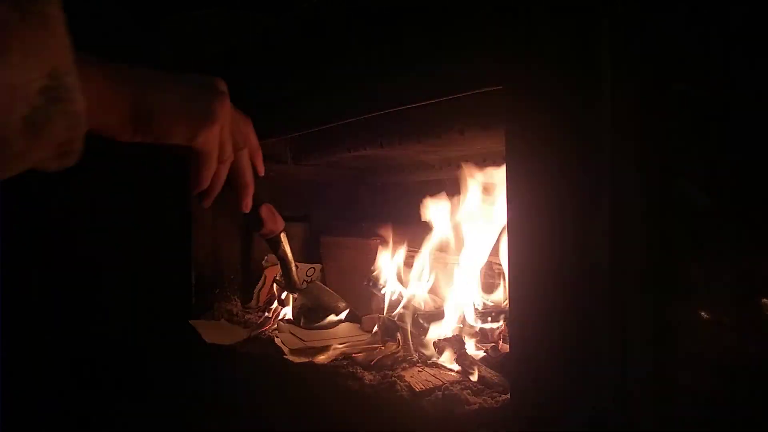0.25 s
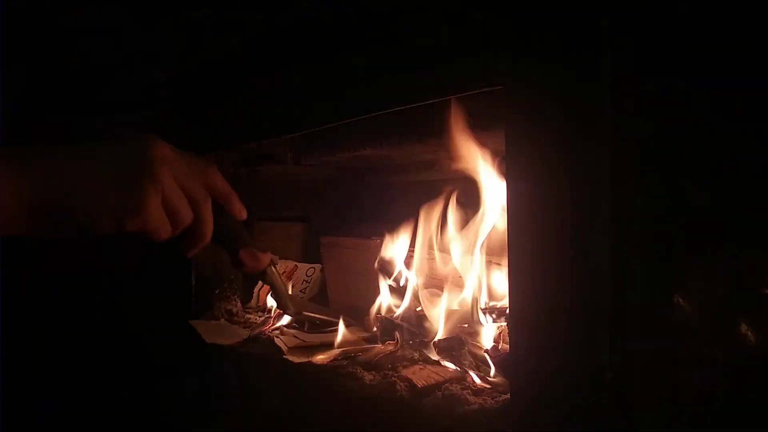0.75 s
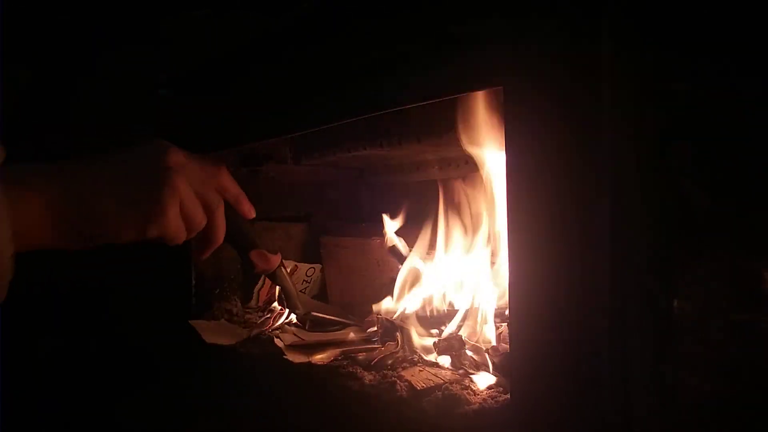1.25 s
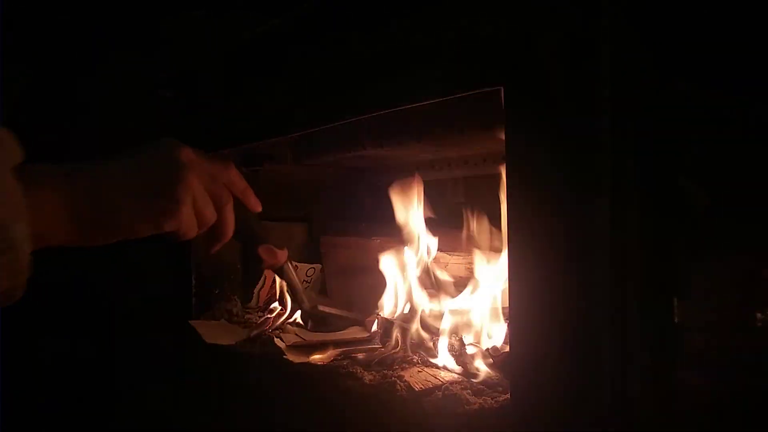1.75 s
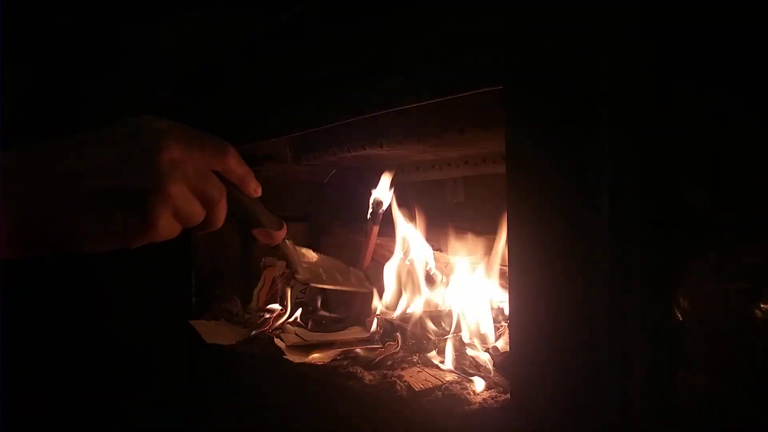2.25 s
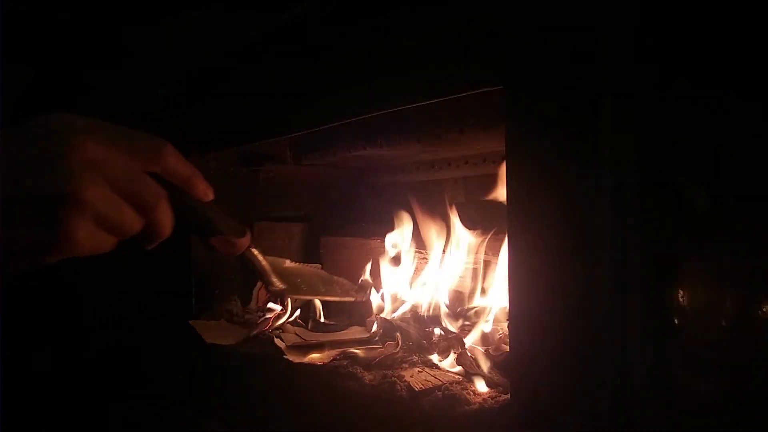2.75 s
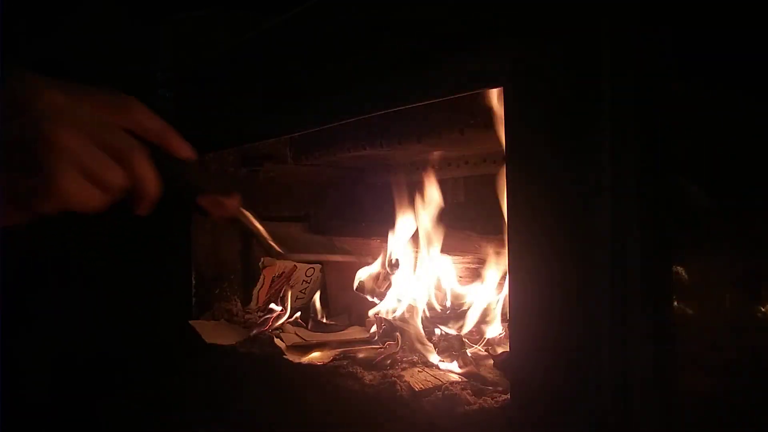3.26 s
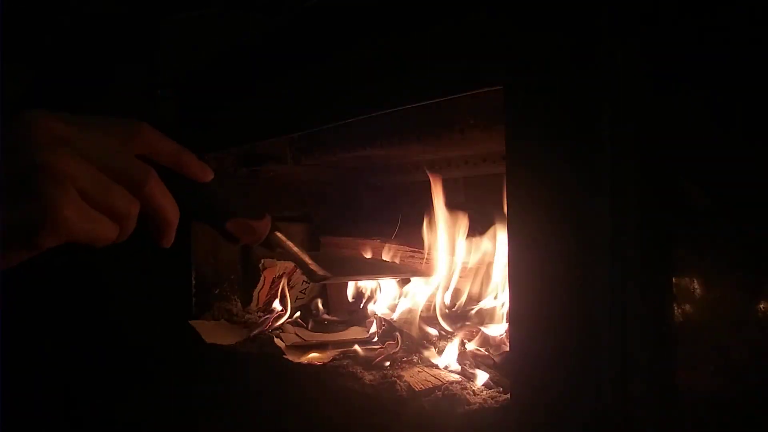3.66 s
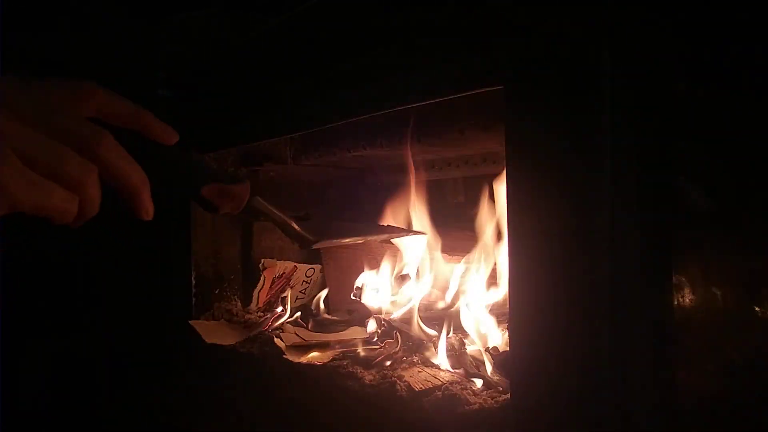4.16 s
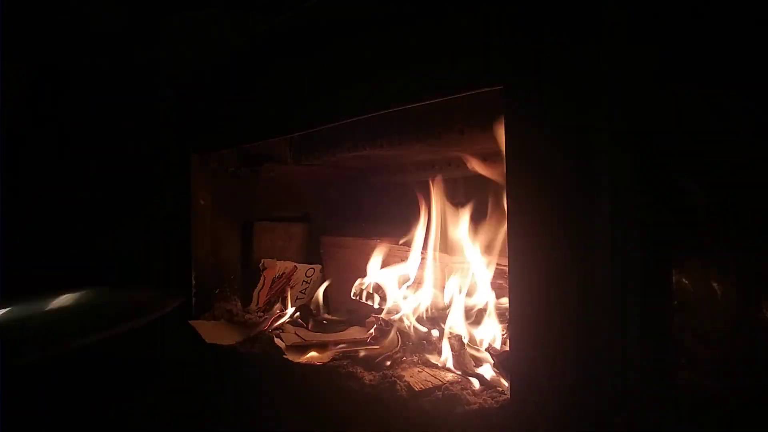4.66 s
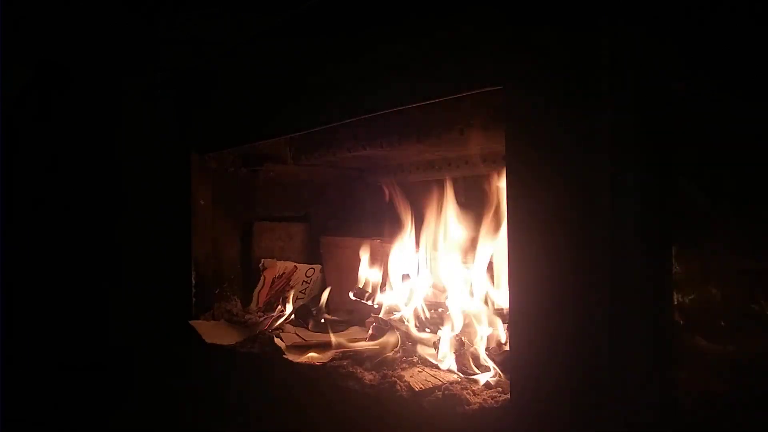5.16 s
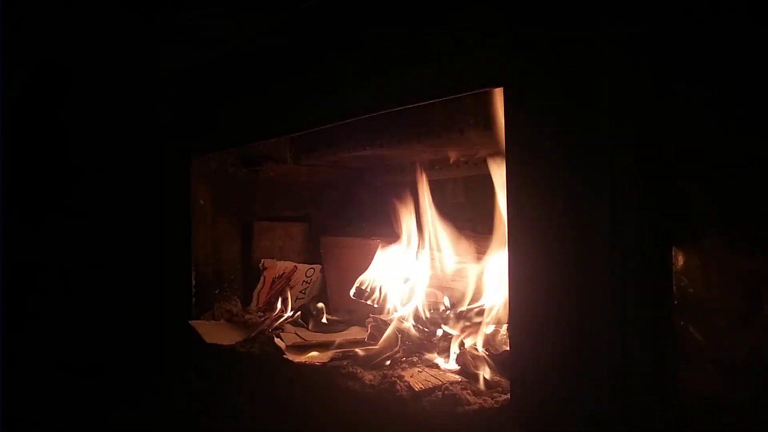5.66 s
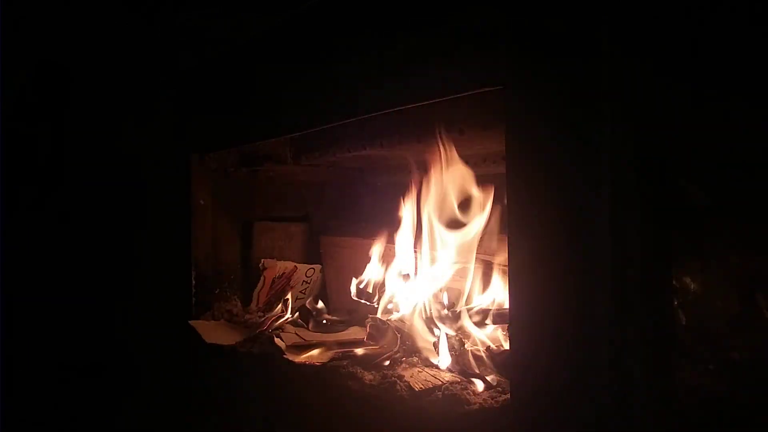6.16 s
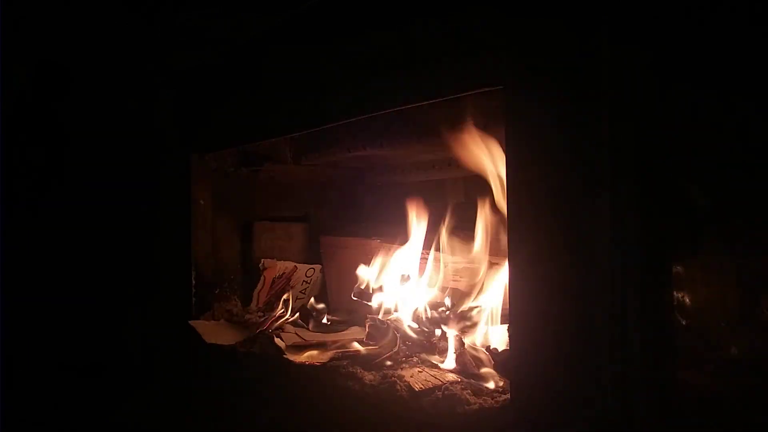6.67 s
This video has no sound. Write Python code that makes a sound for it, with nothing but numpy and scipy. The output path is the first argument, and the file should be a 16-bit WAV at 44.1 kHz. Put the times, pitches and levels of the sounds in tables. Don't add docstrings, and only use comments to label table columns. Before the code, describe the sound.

Close to the microphone, a small paper fire flutters softly with a faint hiss and needle-sharp pops. A hand shovel pushes crackling paper and kindling, busiest around two seconds, with soft wooden knocks and faint metallic squeaks. After a quieter stretch, the shovel drops on sheet metal at about 5.4 seconds with a bright clang, then its handle bounces. Paper rustles again at the end. Small room, short slap off the far wall.

```python
import sys
import numpy as np
from scipy import signal
from scipy.fft import rfft, irfft
from scipy.io import wavfile
from scipy.ndimage import uniform_filter1d

SR = 44100
rng = np.random.default_rng(int(sys.argv[2]) if len(sys.argv) > 2 else 0)


def convert_level_to_amplitude(level_db):
    exponent = np.asarray(level_db, float) / 20
    return 10 ** exponent


def unload_wav(signal):
    wavfile.write(
        sys.argv[1],
        SR,
        np.round(np.clip(np.atleast_2d(signal).T, -1, 1) * 32767).astype(np.int16),
    )


N = 305613
T = np.arange(N) / SR
SNAP_T60_S = 0.012
# [t/s, peak/dB, middle/dB, bottom/dB]
BANGS = [
    (0.216, 2, -26, -22.5),
    (1.1038, -4.5, -27.5, -23.5),
    (1.4709, -12.5, -14, -26),
    (3.2265, -4, -25, -21),
    (4.4567, -20, -9, -21),
    (6.105, -21, -5.5, -9),
]


def shaped(x, spectrum):
    hz, db = np.transpose(spectrum)
    f = np.maximum(np.arange(N // 2 + 1) * SR / N, 1)
    return irfft(rfft(x) * convert_level_to_amplitude(np.interp(np.log(f), np.log(hz), db)), N)


def band(x, lo_hz, hi_hz):
    sos = signal.butter(2, [lo_hz, min(hi_hz, .45 * SR)], "band", fs=SR, output="sos")
    return signal.sosfilt(sos, x)


def unit(x):
    return x / np.sqrt(np.mean(x ** 2))


def noise():
    return rng.standard_normal(N)


def walk(rate_hz):
    k = int(SR / rate_hz)
    held = np.repeat(rng.standard_normal(N // k + 1), k)
    return unit(uniform_filter1d(uniform_filter1d(held, k), k)[:N])


def grains(rate_hz, spread_db, t60_s):
    size_db = np.minimum(spread_db * rng.exponential(size=N), 12)
    size = (rng.random(N) < rate_hz / SR) * convert_level_to_amplitude(size_db)
    return unit(signal.lfilter([1], [1, -10 ** (-3 / (t60_s * SR))], size))


def bursts(times_s, dbs, t60s_s):
    env = np.zeros(N)
    for s, db, t60 in zip(times_s, dbs, t60s_s):
        i = int(s * SR)
        t = T[:min(int(1.5 * t60 * SR), N - i)]
        env[i:i + len(t)] += convert_level_to_amplitude(db - 60 * t / t60)
    return env


def taps(times_s, dbs):
    out = np.zeros(N)
    np.add.at(out, (np.asarray(times_s) * SR).astype(int), convert_level_to_amplitude(dbs))
    return out


def ring(x, modes):
    out = 0
    for hz, db, t60 in modes:
        r, w = 10 ** (-3 / (t60 * SR)), 2 * np.pi * hz / SR
        out = out + convert_level_to_amplitude(db) * signal.lfilter([0, r * np.sin(w)], [1, -2 * r * np.cos(w), r * r], x)
    return out


def spits(rows, gain_db, t60_s, width):
    out, t = np.zeros(N), T[:2000]
    for (s, db, hz), spit in zip(rows, rng.standard_normal((len(rows), 2000))):
        i = int(s * SR)
        out[i:i + 2000] += unit(band(spit, hz / width, hz * width)) * convert_level_to_amplitude(db + gain_db - 60 * t / t60_s)
    return out


def flames():
    # [t/s, level/dB]
    draught = [(0, -52.5), (1.2, -52), (2.4, -50), (3.4, -52), (4.6, -53), (5.3, -52), (6.4, -52),
               (6.6, -46.5), (6.93, -50)]
    # [f/Hz, density/dB per Hz]
    fire_spectrum = [(18, -54), (30, -27.5), (106, -10), (140, -3.5), (243, -16), (268, -18), (310, -15.5),
                     (488, -16.5), (532, -17), (900, -31.5), (1170, -71.5), (1980, -120)]
    # [f/Hz, density/dB per Hz]
    hiss_spectrum = [(400, -34.5), (700, -5.5), (1000, -4.5), (1300, -6), (3800, -15), (5800, -15),
                     (8400, -28), (10700, -19.5), (13200, -24.5), (15200, -16.5), (16000, -15)]
    roar = unit(shaped(noise(), fire_spectrum)) * convert_level_to_amplitude(np.interp(T, *np.transpose(draught)))
    roar *= convert_level_to_amplitude(walk(22))
    hiss_db = -64
    return roar + unit(shaped(noise(), hiss_spectrum)) * convert_level_to_amplitude(hiss_db)


def strokes():
    # [start/s, end/s, start/dB, end/dB, dullness/dB]
    stroke_rows = [(0, 0.093, -68, -88, 11), (0.227, 0.69, -60.5, -54.5, -3.5), (0.699, 1, -51, -54, 0),
                   (0.998, 1.149, -46.5, -55.5, 0), (1.159, 1.393, -51.5, -55.5, -1.5),
                   (1.419, 1.678, -55.5, -53, 0), (1.73, 1.864, -44, -45, -1.5),
                   (1.87, 2.167, -39, -42.5, -3), (2.158, 2.217, -34, -43, -4),
                   (2.22, 2.319, -48.5, -42.5, -3.5), (2.327, 2.477, -46.5, -56.5, -3.5),
                   (2.483, 2.533, -48, -64, -1), (2.546, 2.584, -48, -62, 0.5),
                   (2.577, 2.817, -73, -55.5, 1), (3.42, 3.554, -63, -60, 3.5),
                   (3.556, 3.707, -52.5, -52.5, -8), (4.698, 5.303, -81.5, -75.5, 6),
                   (5.45, 5.892, -64, -66.5, 7), (5.897, 6.08, -65, -69, 10), (6.098, 6.503, -70, -71, 3.5),
                   (6.518, 6.626, -58, -58, 4), (6.655, 6.77, -59.5, -61, 4.5),
                   (6.775, 6.862, -47, -48, -1.5), (6.865, 6.926, -39, -75, 1)]
    rest_db = (-68, -75, -78)
    edge_s, dull_offset_db, dull_slope = 0.013, -5.5, 2.48
    gain = np.outer(convert_level_to_amplitude(np.array(rest_db)), np.ones(N))
    for start, end, start_db, end_db, dull_db in stroke_rows:
        on = slice(max(int((start - edge_s) * SR), 0), int((end + edge_s) * SR))
        edge = np.clip(np.minimum(T[on] - start, end - T[on]) / edge_s + .5, 0, 1)
        push = edge * convert_level_to_amplitude(np.interp(T[on], [start, end], [start_db, end_db]))
        tilt_db = np.array([0, dull_db, dull_offset_db + dull_slope * dull_db])
        gain[:, on] += np.outer(convert_level_to_amplitude(tilt_db), push)
    return 20 * np.log10(gain)


def rustle():
    top_db, mid_db, low_db = strokes()
    shared = unit(0.95 + .5 * grains(260, 2.8, 0.0086))
    shared *= convert_level_to_amplitude(1.5 * walk(40))
    colours = [(950, low_db - 12.0), (1400, low_db - 13), (1900, low_db - 9.0),
               (2600, mid_db - 15.5), (3400, mid_db - 10.5), (4600, mid_db - 9.5), (6100, mid_db - 9.5),
               (8000, top_db - 25.0), (10400, top_db - 12.0), (14000, top_db - 16.5)]
    out = np.zeros(N)
    for hz, db in colours:
        patch = convert_level_to_amplitude(db + 3.2 * walk(30))
        out += patch * unit(band(noise(), hz / 1.256, hz * 1.134))
    return shared * out


def kindling():
    # [t/s, peak/dB, f/Hz]
    knock_rows = [(0.434, -33, 150), (0.736, -37, 570), (0.864, -35.5, 590), (1.715, -36.5, 363),
                  (1.748, -30.5, 730), (2.548, -35.5, 192), (3.579, -39, 151), (6.562, -36, 268),
                  (6.659, -39.5, 1105), (1.632, -40, 2570), (5.718, -40, 2492), (2.303, -39, 3240),
                  (6.662, -38, 5240)]
    out = np.zeros(N)
    for s, db, hz in knock_rows:
        i = int(s * SR)
        t = T[:min(4000, N - i)]
        attack = np.minimum(t / 0.0016, 1)
        out[i:i + len(t)] += convert_level_to_amplitude(db - 60 * t / 0.042) * np.sin(2 * np.pi * hz * t) * attack
    return out


def cracks():
    # [t/s, peak/dB, f/Hz]
    crack_rows = [(0.7502, -43, 5460), (0.8165, -36, 5060), (1.2965, -45, 5400), (1.4391, -34, 5030),
                  (1.5744, -41, 3450), (1.786, -28, 2910), (1.8044, -35, 2660), (1.8194, -32, 2630),
                  (1.8324, -36, 7100), (1.8711, -26, 6200), (1.91, -33, 2990), (1.9204, -30, 3880),
                  (1.9424, -31, 6550), (1.9505, -27, 4690), (1.9624, -32, 5260), (1.9904, -33, 5330),
                  (2.0004, -32, 5720), (2.0144, -28, 4870), (2.0274, -30, 5500), (2.0474, -33, 6740),
                  (2.0747, -34, 5010), (2.1034, -34, 3430), (2.1804, -31, 4600), (2.2323, -41, 5810),
                  (2.2608, -35, 3290), (2.2794, -38, 2990), (2.2954, -29, 3290), (2.3396, -33.5, 6460),
                  (2.3935, -35, 5490), (2.4503, -40, 4130), (2.4848, -40, 4190), (3.4344, -36, 3190),
                  (3.4454, -44, 2780), (3.4594, -46, 4190), (3.5704, -38.5, 4730), (3.582, -34, 4750),
                  (3.6064, -43, 4400), (3.6166, -45, 4790), (3.6304, -47, 4790), (3.6481, -45, 4500),
                  (3.6794, -49, 4980), (3.6914, -53, 4690), (3.7044, -56, 4610), (4.4784, -45, 6130),
                  (4.4874, -48, 5670)]
    return spits(crack_rows, gain_db=-8.5, t60_s=0.033, width=1.08)


def tints():
    # [t/s, peak/dB, f/Hz]
    tint_rows = [(1.4696, -30, 15100), (3.2251, -15, 15000), (4.4558, -24, 15200), (4.8743, -36, 14800),
                 (6.0387, -37, 14100), (6.104, -28, 15100),
                 (1.1024, -25, 7100), (1.4696, -25, 6760), (3.2251, -18, 6890), (4.4558, -27, 6320),
            (5.3328, -14, 5840), (5.4894, -13, 6190), (5.6281, -35, 5900), (6.104, -28, 5890),
                 (5.3328, -9, 4150), (5.4141, -11, 4400), (5.4889, -15, 4130), (5.6296, -31, 3610),
           (5.885, -24, 4060),
                 (0.2149, -23, 1970), (1.1029, -31, 3400), (5.3328, -12, 3230), (5.4146, -9, 1990)]
    return spits(tint_rows, gain_db=-5, t60_s=.03, width=1.06)


def pop_rows():
    # [t/s, peak above 7 kHz/dB, body (duller part)/dB]
    snap_rows = [(0.0591, -15, -13), (0.108, -38.5, -9), (0.77, -21, -14), (1.6347, -31.5, -5),
                 (1.833, -24, -19), (1.6, -21, -25), (1.6, -22, -20), (2.3, -24, -22), (2.088, -28, -20),
                 (1.9, -25, -20), (2.1285, -24, -18), (2.1605, -20, -20), (2.1765, -18, -22),
                 (1.297, -32.5, -13), (4.7, -47, -3), (1.8717, -30, -4.5), (2.1359, -16, -19),
                 (2.166, -13, -27), (2.4339, -39.5, -3), (2.2, -29, -29), (4.8738, -25, -19),
                 (5.211, -41, -15), (5.693, -44, -22), (6.6, -48, -4), (6.0405, -22.5, -14),
                 (6.594, -36, -20), (6.515, -47, -5), (6.445, -44, -8), (4.8, -39, -17), (3.175, -46, -8.5)]
    # [t/s, peak/dB, body/dB]
    tick_rows = [(0.381, -28, -24), (0.6025, -46, -13), (0.781, -34, -19), (0.8427, -21, -25),
                 (0.9562, -30, -21), (1.1656, -26, -13.5), (1.2208, -33.5, -8), (1.2613, -28, -15),
                 (1.923, -22, -10.5), (2.0413, -20, -19), (2.209, -23, -17), (2.29, -33.5, -1.5),
                 (2.3432, -23, -15.5), (2.395, -27, -13), (2.485, -24, -11.5), (2.6846, -33, -19),
                 (2.7837, -32, -24), (2.8948, -41, -18), (3.4485, -35, -12), (3.4654, -30, -21),
                 (3.6137, -30, -19), (4.1118, -32, -18), (4.2762, -40, -19), (4.3214, -39, -21),
                 (4.3331, -29.5, -17.5), (4.372, -36, -21), (4.732, -36.5, -16), (6.5373, -34.5, -17),
                 (6.8126, -16, -7)]
    # [t/s, peak/dB, body/dB]
    crunch_rows = [(0.4005, -26.5, -17.5), (0.4866, -20.5, -11), (0.814, -24.5, -15), (1.4452, -24.5, -12),
                   (1.569, -34.5, -7.5), (1.9486, -17, -18), (2.000, -21, -25), (2.009, -16, -25),
                   (2.015, -23, -25), (3.5732, -23, -22), (5.9349, -21.5, -11.5), (5.9813, -26, -12),
                   (6.0048, -33, -6), (6.5479, -21.5, -26), (6.6104, -24.5, -14.5), (6.6622, -27.5, -6)]
    # [t/s, peak/dB, middle/dB, bottom/dB, t60/s]
    thud_rows = [(1.7113, -43, 2, 15.5, 0.055), (1.739, -42, -24, 2, 0.01),
                 (1.7514, -17, -10.5, -9.5, 0.036), (1.787, -26, -2, -4, 0.067),
                 (2.5384, -35, -18, -4, 0.013), (3.4016, -16.5, -4.5, -8.5, 0.041),
                 (5.002, -37.5, -24, 4, 0.023), (5.3339, -18, 11.5, -8, 0.019),
                 (5.414, -0.5, -1.5, -36, 0.049), (5.4903, 4, -14, -34, 0.029),
                 (5.6279, -55.5, 28, 28, 0.029), (5.7128, -28.5, -29, 4, 0.034),
                 (5.8852, -13, -5.5, -6.5, 0.022), (5.9352, -38, -5, 12.5, 0.015),
                 (5.9682, -25.5, -5.5, -1, 0.035), (6.56, -44, -10, 15, 0.044),
                 (6.776, -37, 1.5, -4, 0.042), (6.7866, -38, -3, 1, 0.056)]
    out = []
    for rows, t60 in ((snap_rows, SNAP_T60_S), (tick_rows, 0.028), (crunch_rows, 0.058)):
        for s, db, body_db in rows:
            bottom_db = -9 + 0.74 * body_db
            out.append((s, db, body_db, bottom_db, t60))
    return out + [(*row, SNAP_T60_S) for row in BANGS] + thud_rows


def pops():
    s, top_db, mid_db, low_db, t60 = np.transpose(pop_rows())
    snap_db = 3 - 300 * (t60 - .013)
    # low/Hz, high/Hz, level/dB, length factor
    bands = ((7700, 14500, -14.5, 1.56), (2190, 6000, mid_db - .5, 1.88), (298, 1480, low_db - 4, 1.9))
    out = 0
    for lo, hi, db, last in bands:
        spray = uniform_filter1d(bursts(s, top_db + db - 10, last * t60), size=61, origin=30)
        snap = bursts(s, top_db + db + snap_db, np.full(len(s), .004))
        out = out + unit(band(noise(), lo, hi)) * (spray + snap)
    return out


def needles():
    # [t/s, level/dB]
    edge_rows = [
        (5.334, -9),
        (5.4148, -6),
    ]
    s, peak_db, _, bottom_db = np.transpose(BANGS)
    steps = taps(s, peak_db + bottom_db - 2.0) + taps(*np.transpose(edge_rows))
    return band(steps, 150, 17000)


def squeaks():
    # [start/s, length/s, f/Hz, level/dB]
    squeak_rows = [(0.127, .21, 4975, -68), (0.343, .09, 4975, -60), (0.14, .065, 11110, -63),
                   (.15, .055, 8185, -71), (0.156, .03, 2545, -61), (1.5, .12, 3400, -66),
                   (1.58, .05, 4000, -62), (1.5, .1, 4975, -69), (5.13, .05, 6915, -76),
                   (5.11, .07, 3900, -76), (3.55, .06, 4975, -67), (.3, .06, 2545, -69),
                   (.37, .08, 6915, -71), (0.614, .046, 6915, -68), (1.026, .07, 11110, -62),
                   (1.04, .06, 6915, -67), (1.5, .19, 8185, -67), (1.53, .12, 6915, -70),
                   (1.6, .06, 11110, -65), (1.638, .04, 3760, -51), (1.87, .037, 11110, -52),
                   (2.575, .085, 4975, -62), (2.68, .09, 4975, -69), (2.57, .08, 11110, -71),
                   (2.6, .06, 8185, -73), (2.58, .1, 6915, -74), (3.46, .05, 8185, -65),
                   (3.45, .1, 4975, -67), (2.098, .23, 1600, -66), (2.26, .06, 3300, -66),
                   (6.69, .17, 1280, -58), (6.72, .06, 3500, -64), (6.812, .06, 1990, -53),
                   (6.67, .09, 4975, -67)]
    out = np.zeros(N)
    for start, length, hz, db in squeak_rows:
        t = T[:int(length * SR)]
        line = ring(rng.standard_normal(SR // 2), [(hz, 0, .09)])[-len(t):]
        line = unit(line / (uniform_filter1d(abs(line), size=300) + 1e-9) ** .35)
        fade = np.minimum(np.minimum(t, length - t) / 0.0099, 1)
        i = int(start * SR)
        out[i:i + len(t)] += convert_level_to_amplitude(db) * fade * line
    return out


def handle():
    # [t/s, peak/dB]
    bounce_rows = [
        (5.885, -3),
        (5.9274, -16),
        (5.9648, -22.5),
        (5.9707, -23),
        (6.009, -26),
        (6.085, -35),
        (6.8114, -30),
    ]
    # [f/Hz, level/dB, t60/s]
    handle_modes = [(700, -15, 0.035), (1202.5, -9, 0.041), (1315, 7.5, 0.021), (1648, 3, 0.024),
                    (1850, -18, 0.089), (2130, -16.5, 0.054), (2960, -9, 0.021)]
    s, db = np.transpose(bounce_rows)
    return band(ring(taps(s, db - 10.0), handle_modes), 1090, 5000)


def shovel():
    # [t/s, crash/dB, blade/dB, scoop/dB, hearth/dB]
    clang_rows = [
        (3.822, -39.5, -65, -50, -64),
        (4.991, -46, -75, -51, -54),
        (5.335, -20.5, -16, -35.5, -47),
        (5.415, -12.5, -28.5, -29, -20.5),
        (5.426, -14.5, -37, -33.5, -26.5),
        (5.445, -18.5, -34, -37, -17),
        (5.490, -19, -17, -41, -19.5),
    ]
    # [t/s, crash/dB, blade/dB, scoop/dB, hearth/dB]
    touch_rows = [
        (3.402, -37.5, -39.5, -20, -49),
        (5.63, -29, -42, -36, -34.5),
        (5.718, -39, -40, -42, -37),
    ]
    # [f/Hz, level/dB, t60/s]
    blade_modes = [(517.3, -3, 0.17), (1097, 0, 0.2), (1305.6, -1, 0.31), (1672, -11.5, .25),
                   (2245, -13, 0.15), (3176, -8.5, 0.185), (3455, -13.5, .14), (3671, -16, 0.13),
                   (4190, -8, 0.24), (5270, -13.5, 0.14), (5647, -16, 0.14), (6050, -9.5, .2),
                   (6230, -7, 0.3), (6900, -16.5, 0.17), (7270, -17, .11), (8170, -13, 0.11),
                   (10440, -11.5, 0.11), (11104, -4, 0.12)]
    # [f/Hz, level/dB, t60/s]
    scoop_modes = [(522, -3, 0.16), (1220, -30, .1), (1480, -9.5, 0.15), (2030, -31, .12),
                   (2420, -2, 0.089), (3000, -8, .12), (3270, -11.5, .14), (3876, -15.5, 0.13),
                   (4230, -9.5, .12), (4540, -34.5, .1)]
    # [f/Hz, level/dB, t60/s]
    hearth_modes = [(138.9, -3, 2), (199.4, -15.5, 0.76), (266.5, 1.5, 0.42), (327.4, -4.5, 1.61),
                    (397.6, -11, 1.02), (496, -6, 0.89), (533, -4, 0.7), (591, -5, 0.59), (711, -7.5, 0.28),
                    (739, -7.5, 0.42), (869.7, 1.5, 0.23), (990, -11, .3), (1069, -17, 1.3),
                    (1110, -2, 0.33), (1288, -24, 1.3), (1410, -17, 0.17), (1510, -9, 0.199),
                    (1645, -17, 0.53), (1868, -30, 1.7), (1980, -13, 0.25), (2070, -21.5, 0.15),
                    (2550, -18.5, 0.24), (3100, -23, .2), (3600, -28, .2)]
    # [f/Hz, density/dB per Hz]
    crash_spectrum = [(88, -42.5), (150, -20), (313, -1.5), (434, -14), (515, -7), (725, -11.5), (804, -17),
                      (876, -14.5), (1190, -9), (9000, -32.5), (11700, -29), (19800, -120)]
    # [t/s, level/dB]
    jolt_rows = [
        (5.334, -40.5),
        (5.415, -40),
        (5.49, -36),
    ]
    wobble_db = 2.5
    s, crash_db, blade_db, scoop_db, hearth_db = np.transpose(clang_rows + touch_rows)
    t60 = [0.22] * len(clang_rows) + [0.086] * len(touch_rows)

    rattle = unit(1.8 + grains(260, 3, .008))
    buzz_modes = [(hz, db, .045) for hz, db, _ in blade_modes if 2000 < hz < 9000]
    buzz = unit(ring(noise(), buzz_modes)) * rattle * bursts(s, blade_db - 10, t60)
    blade = ring(taps(s, blade_db - 9.0), blade_modes) + buzz

    scoop_push = taps(s, scoop_db - 9.5)
    scoop = 0
    for hz, db, ring_s in scoop_modes:
        scoop = scoop + convert_level_to_amplitude(wobble_db * walk(60)) * ring(scoop_push, [(hz, db, 0.85 * ring_s)])

    thicket = [(400 * 14 ** a, -19 - 4 * a - 8 * b, 0.13 + 0.16 * c) for a, b, c in rng.random((60, 3))]
    hearth_push = taps(s, hearth_db - 6)
    hearth = ring(hearth_push, thicket)
    for mode in hearth_modes:
        hearth = hearth + convert_level_to_amplitude(wobble_db * walk(18)) * ring(hearth_push, [mode])

    crash = unit(shaped(noise(), crash_spectrum + [(16000, -64)]))
    crash = convert_level_to_amplitude(-1.5) * crash * rattle * bursts(s, crash_db, t60)
    jolt = ring(taps(*np.transpose(jolt_rows)), [(38, 0.000064, .07)])
    return band(blade + scoop + crash, 250, 9200) + band(band(hearth, 112, 7000), 113, 9000) + jolt


def room(x):
    wall_s, wall_db, tail_db, tail_t60_s = 0.0313, -40, -43, 0.23
    t = T[:SR // 2]
    diffuse = unit(rng.standard_normal(len(t)))
    tail = convert_level_to_amplitude(tail_db - 60 * t / tail_t60_s) * np.minimum(t / 0.0066, 1)
    late = np.maximum(t - wall_s, 0)
    slap = convert_level_to_amplitude(wall_db - 60 * late / 0.012) * (t >= wall_s)
    return x + signal.fftconvolve(x, diffuse * (tail + slap))[:N]


def scene():
    background = flames() + rustle()
    hits = kindling() + cracks() + pops() + needles() + squeaks() + handle() + shovel()
    return (background + tints() + room(hits))[None]


def roll_off(x):
    return signal.sosfilt(signal.butter(12, 16970, fs=SR, output="sos"), x)


def record(dry):
    port_hz, port_db, port_width_hz, top_hz = 10240, 11.5, 1400, 15680
    b, a = signal.iirpeak(port_hz, port_hz / port_width_hz, fs=SR)
    x = np.tanh(dry + (convert_level_to_amplitude(port_db) - 1) * signal.lfilter(b, a, dry))
    x = signal.sosfilt(signal.butter(2, 45, "high", fs=SR, output="sos"), x)
    x = signal.sosfilt(signal.ellip(6, .3, 34, top_hz, fs=SR, output="sos"), x)
    return roll_off(x)


dry = scene()
out = record(dry)
unload_wav(out)
```